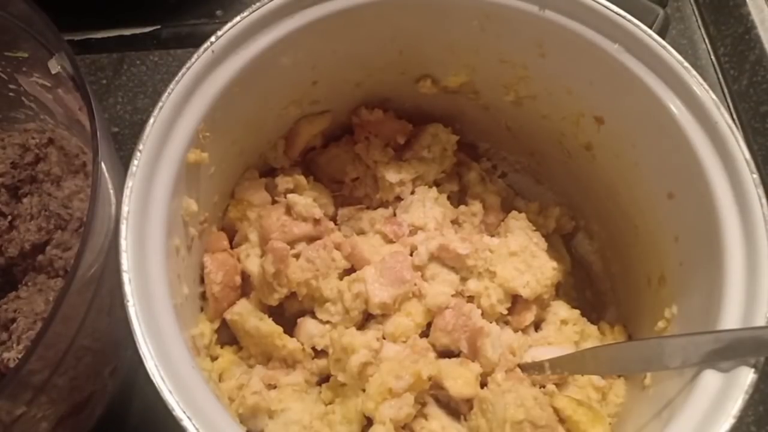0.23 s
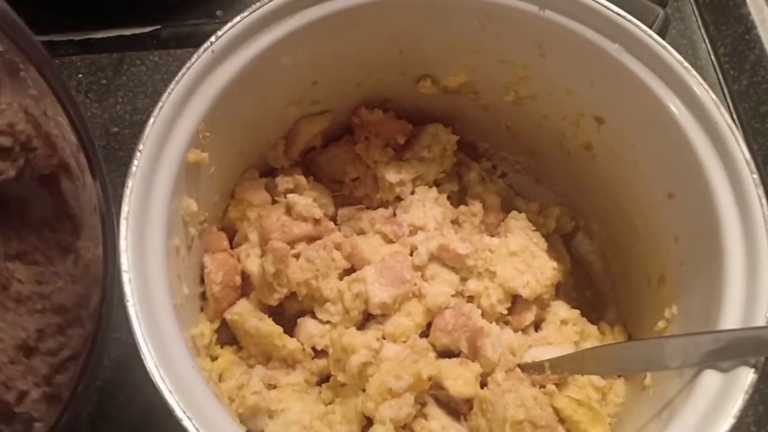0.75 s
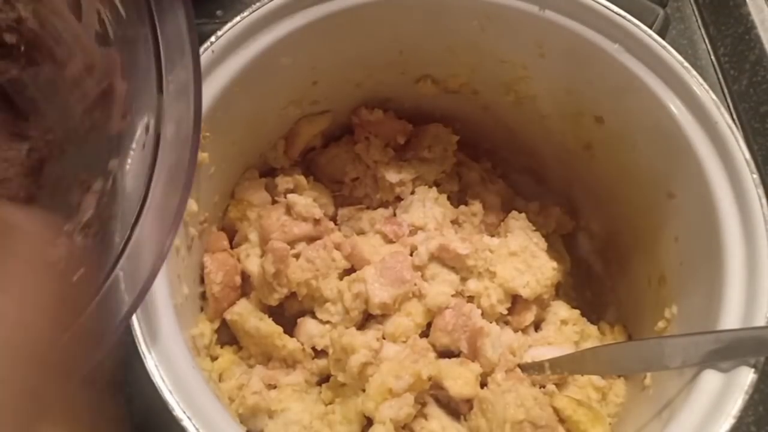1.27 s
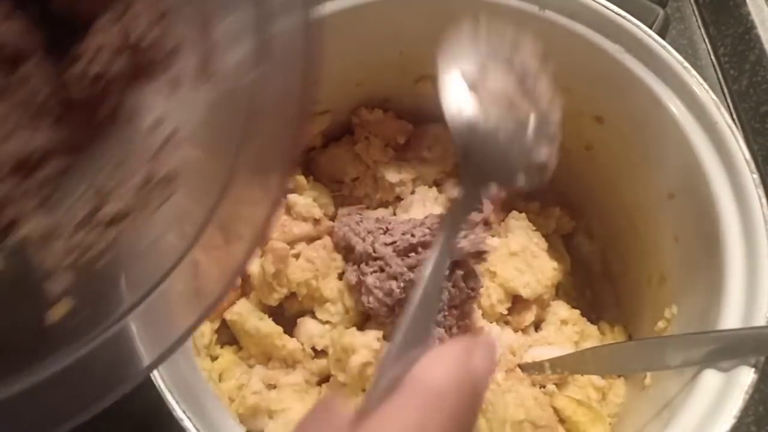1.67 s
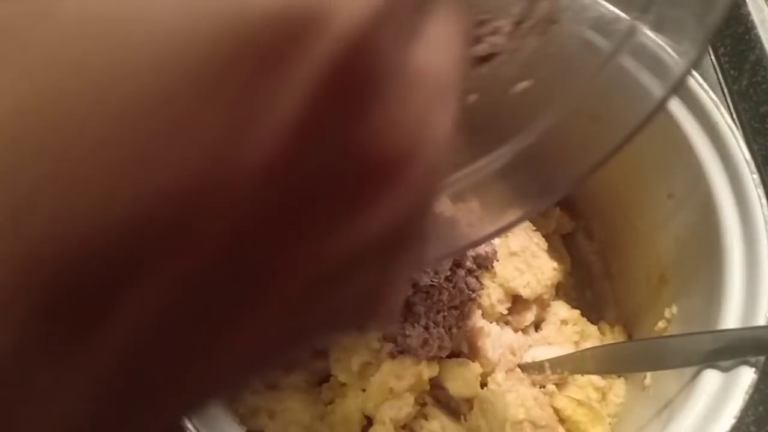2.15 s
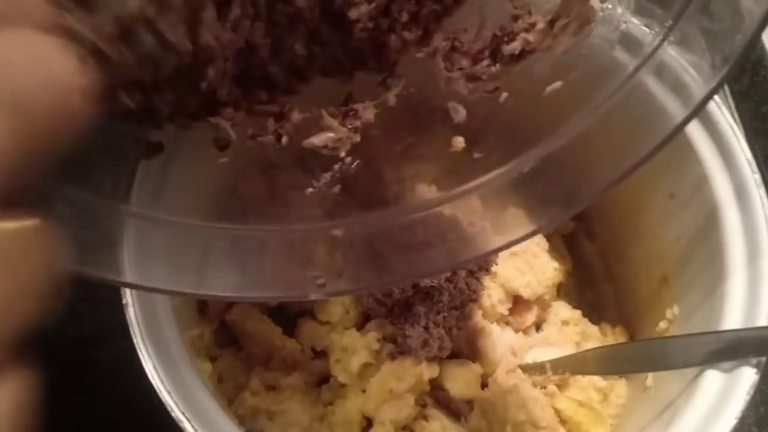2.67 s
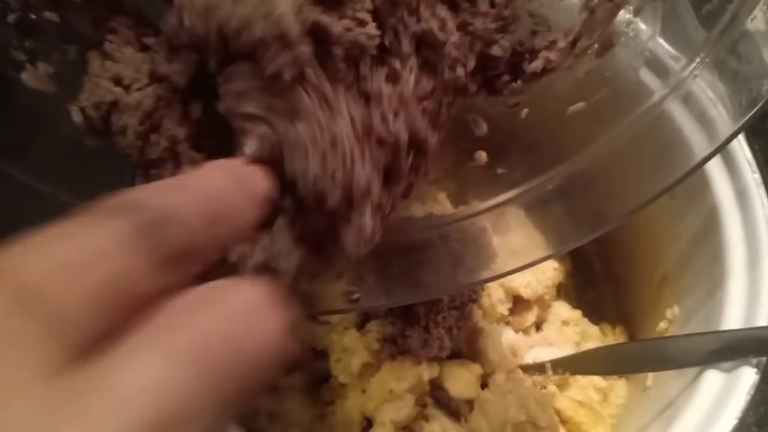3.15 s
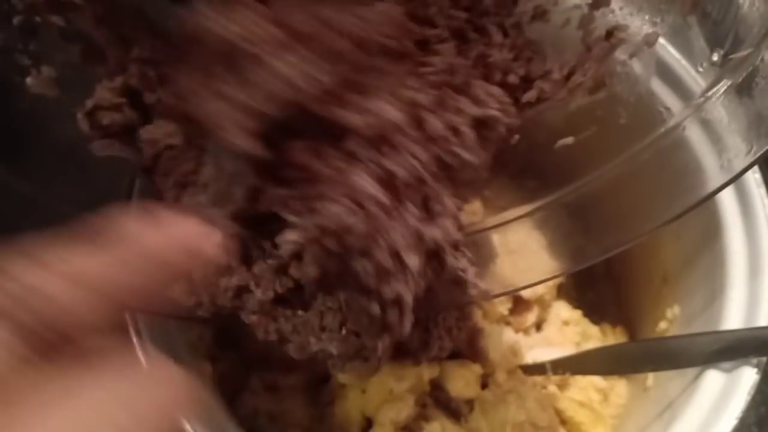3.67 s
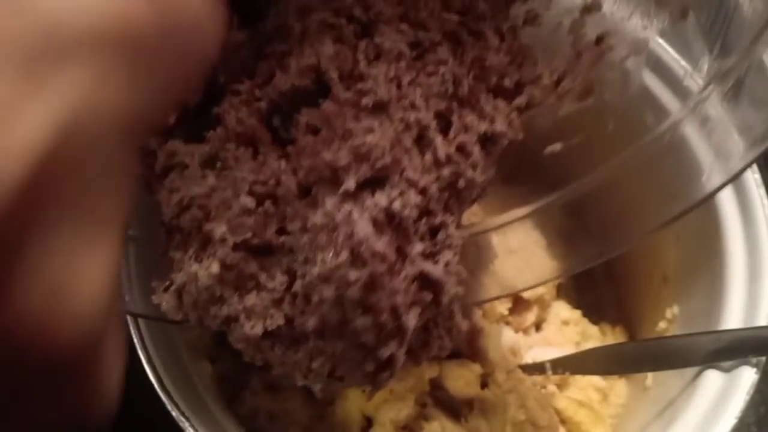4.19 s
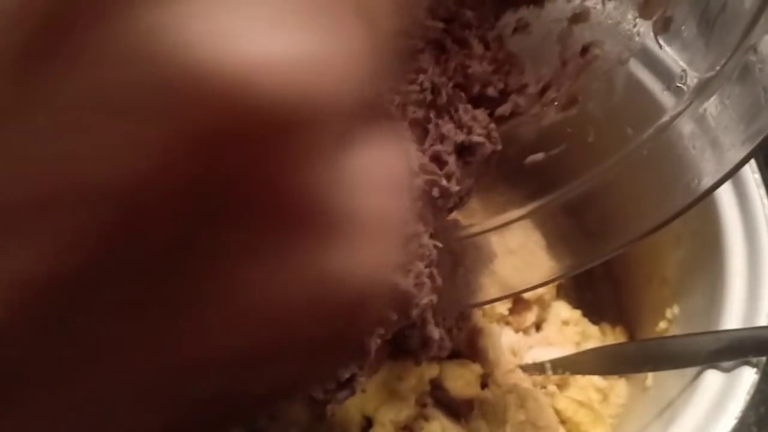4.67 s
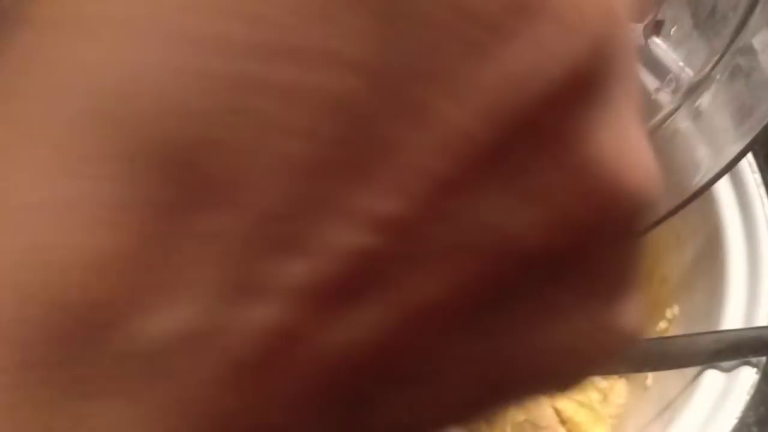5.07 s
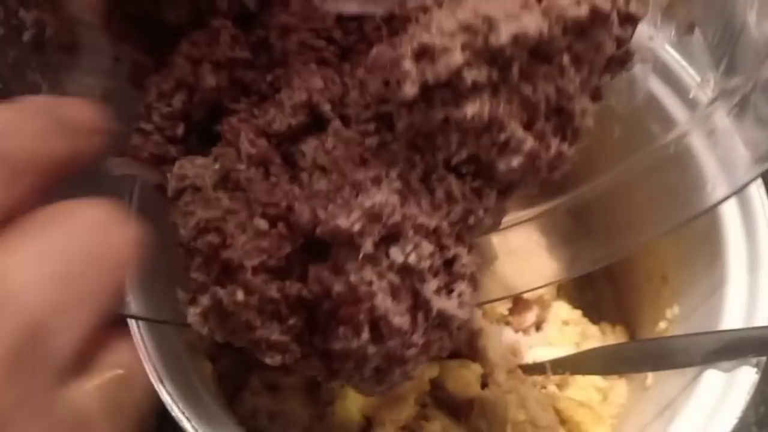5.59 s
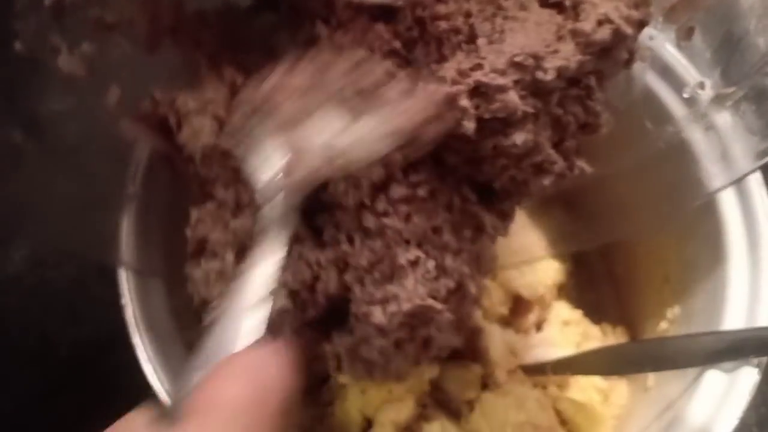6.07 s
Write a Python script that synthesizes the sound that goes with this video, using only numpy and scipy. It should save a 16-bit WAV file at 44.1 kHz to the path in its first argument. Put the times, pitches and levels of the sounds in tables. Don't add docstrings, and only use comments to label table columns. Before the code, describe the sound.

A thick wet mixture is scooped from a bowl into a metal pot. Short dry scrapes and a low rubbing moan lead to hollow, clacking knocks; the mass then crackles, snaps and squelches softly as it is pushed. Bright spoon ticks and low pot booms punctuate it. A brief falling squeak sounds near the end. Close stereo pickup, short lively kitchen echo, quiet appliance hum.

```python
import sys
import numpy as np
from scipy import signal
from scipy.fft import rfft, irfft
from scipy.io import wavfile

SR = 44100
rng = np.random.default_rng(int(sys.argv[2]) if len(sys.argv) > 2 else 0)


def output_pcm(signal):
    pcm = np.clip(np.atleast_2d(signal).T, -1, 1) * 32767
    wavfile.write(sys.argv[1], SR, np.round(pcm).astype(np.int16))


def nominal_scale(level):
    x = np.asarray(level, float) / 20
    return 10 ** x


N = 279594

# (frequency [Hz], density [dB per Hz])
HUM_SPECTRUM = [(12, -47.5), (20, -0.5), (27, -18), (60, -1.5), (79, -24.5), (142, -3), (272, -23.5),
                (304, -18.5), (350, -39.5), (959, -17), (1270, -23), (2490, -17.5), (3300, -34),
                (9570, -33), (16300, -28)]
# (frequency [Hz], t60 [s])
KITCHEN_T60 = [(150, 0.67), (500, 0.49), (1500, 0.42), (3000, 0.35), (6000, 0.4), (12000, 0.37)]
# (frequency [Hz], share [1])
ECHO_ALIKE = [(100, 1), (400, 0.95), (1500, 0.96), (8000, 0.015)]
# (frequency [Hz], level [dB], t60 [s])
POT_MODES = [(106, -2, .7), (116.3, -2, .7), (140, -6, .4), (165, -8, .4), (205, -4, .4), (243, -2, .3),
             (300, -4, .22), (382, -4, .15), (440, -8, .2), (582, -12, .3), (786, -18, .15)]
# (time [s], peak [dB], push length [s], deep boom [dB])
POT_THUDS = [(1.336, -24.5, 0.0012, -7), (1.344, -28.5, 0.0018, 1), (1.426, -28.5, 0.0027, -6.5),
             (2.135, -24.5, 0.0017, -7), (2.149, -40, 0.0058, 5.5), (2.27, -42, 0.00051, -21),
             (3.09, -31.5, 0.0064, -28), (3.664, -29, 0.0028, -11), (3.711, -41, 0.0011, -27),
             (4.371, -29, 0.0032, -31), (5.226, -39.5, 0.00057, -45), (6.059, -41.5, 0.00098, -9),
             (6.084, -33.5, 0.0042, -8.5)]
# (time [s], peak [dB])
FIBRE_SNAPS = [(2.2992, -20), (2.3521, -36), (2.376, -32), (2.3979, -28), (2.4598, -27), (2.8508, -18),
               (2.8654, -35), (3.1313, -36), (3.1434, -38), (3.1594, -41.5), (3.3857, -29.5), (3.904, -28),
               (3.9694, -36), (4.0133, -39), (4.114, -31), (5.0609, -31), (5.3302, -26), (5.3682, -37),
               (5.3824, -49), (5.4575, -35), (5.8426, -34), (5.896, -43), (5.9174, -45), (6.2672, -39)]
# (frequency [Hz], level [dB])
SNAP_SPECTRUM = [(800, -29), (2500, -5), (3600, -11), (5200, 8), (8000, -13), (13500, -15), (16000, -28)]
# (start [s], length [s], scrape [dB], wetness [dB], brightness [dB])
MINCE_PUSHES = [(0.0, 0.12, -47, -22.5, 8), (0.144, 0.059, -48, -25, 10), (0.26, 0.2, -57, -12, 2),
                (0.44, 0.47, -54.5, 6.5, -3), (0.783, 0.13, -47.5, -20, -7), (0.954, 0.24, -61.5, 2.5, -4),
                (1.145, .15, -57, -5.5, 3.5), (1.318, 0.3, -57, -4.5, -2), (1.585, 0.04, -55, 12, -6),
                (1.907, 0.15, -70, -29, 7), (2.258, 0.23, -54, 1.5, -1.5), (2.413, 0.4, -46.5, -0.5, -0.5),
                (2.762, 0.42, -65.5, 21.5, -2), (2.987, 0.24, -48, 1.5, -5.5), (3.204, 0.21, -65.5, 19, -7),
                (3.417, 0.14, -61, -12, 5), (3.485, 0.41, -53.5, 0.5, 2), (3.735, 0.12, -54.5, 12, 7.5),
                (3.899, 0.063, -48.5, 1.5, -0.5), (4.029, 0.12, -53, 14, 1.5), (4.51, 0.45, -55, -9, 2.5),
                (4.796, 0.19, -50, -6, 0), (5.027, 0.05, -59, 15.5, 2), (5.287, 0.25, -58, 2.5, 2.5),
                (5.464, 0.065, -76.5, 29.5, -3), (5.533, 0.093, -54, 1, -5), (5.775, 0.24, -55.5, 5.5, -3),
                (5.914, 0.22, -50.5, -5, 3), (6.06, 0.12, -50, -3.5, -3), (6.214, 0.11, -53.5, -1, 5)]
# (start [s], length [s], level [dB])
BOWL_DRAGS = [(0.0, 0.085, -46), (.15, .25, -52), (.48, 0.39, -36), (.72, 0.15, -52), (.9, 0.39, -61.5),
              (1.4, 0.25, -59), (2.3, 0.53, -56.5), (3.05, 0.24, -56), (3.5, 0.19, -62), (4.4, 0.21, -45.5),
              (5.55, 0.075, -46), (6.05, 0.088, -48)]
# (frequency [Hz], density [dB per Hz])
DRAG_SPECTRUM = [(71, -46), (120, -49), (200, -19), (248, -15.5), (513, -22), (571, -1), (717, -26),
                 (782, -12), (1600, -36), (2080, -65), (3520, -120)]
# (frequency [Hz], density [dB per Hz])
SCRAPE_SPECTRUM = [(410, -17), (700, -1.5), (828, -8.5), (1050, -4), (1450, -9), (1800, -3.5), (2500, 0),
                   (2860, 1), (3200, -4.5), (3900, -26), (7700, -120)]
# (frequency [Hz], density [dB per Hz])
CRACKLE_SPECTRUM = [(1940, -15.5), (3100, -6), (3700, -2), (4400, 1.5), (5200, 3.5), (7500, -15),
                    (9750, -14.5), (16500, -120)]
# (frequency [Hz], density [dB per Hz])
SIZZLE_SPECTRUM = [(4120, -17), (7000, 1), (9900, -7), (11400, -4.5), (12500, -2.5), (13900, 0), (15700, 2),
                   (16100, -19), (16300, -55)]
# (time [s], pitch [Hz], level [dB])
SQUEAK_TRACKS = [
    [(5.138, 2743, -48.5), (5.15, 2728, -14), (5.168, 2638, -9), (5.178, 2630, -15.5), (5.2, 2590, -19.5),
     (5.215, 2563, -30), (5.3, 2536, -37), (5.4, 2516, -47), (5.46, 2490, -58)],
    [(5.6, 2320, -60), (5.61, 2270, -42), (5.624, 2255, -32), (5.638, 2245, -44), (5.65, 2203, -27.5),
     (5.66, 2196, -49), (5.672, 2213, -28), (5.695, 2233, -49), (5.71, 2191, -38)],
]
# (time [s], pitch [Hz], level [dB])
WHINE_TRACKS = [
    [(0.0, 2270, -44), (0.032, 2176, -53), (0.13, 2280, -74)],
    [(5.92, 2626, -62), (5.934, 2500, -38), (5.97, 2574, -52), (6.1, 2220, -45.5)],
    [(6.17, 2200, -59), (6.176, 2167, -54), (6.2, 2280, -36.5), (6.27, 2390, -42), (6.34, 2426, -41)],
]
# (time [s], pitch [Hz], level [dB])
MOAN_TRACK = [
    (0.475, 601, -44),
    (0.501, 571, -32),
    (0.55, 610, -41),
]
# (multiple of pitch [1], level [dB])
SQUEAK_PARTIAL_LEVELS = [(.5, -42), (1, -5), (1.5, -41), (2, -36), (3, -70)]
# (time [s], frequency [Hz], level [dB], t60 [s])
LOOSE_RINGS = [(.02, 1878, -44, 0.17), (0.028, 3100, -45, 0.13), (0.31, 3100, -32.5, 0.037),
               (2.146, 4080, -29, 0.074), (2.17, 5000, -32, 0.038), (2.9882, 870, -33.5, 0.25),
               (4.3747, 296, -27.5, 0.17), (4.371, 1210, -23, 0.15), (4.374, 247, -32.5, .2),
               (4.764, 1300, -18, 0.059), (5.228, 486.4, -37.5, 0.44), (2.413, 2240, -21, 0.013),
               (2.42, 570, -47.5, 0.97), (4.765, 1180, -27, .07), (3.565, 554, -49.5, 0.17),
               (5.57, 557, -35.5, 0.26), (4.375, 1030, -32.5, .15), (4.476, 1060, -30.5, .2),
               (5.603, 1400, -36, 0.066)]
# (frequency [Hz], level [dB], t60 [s])
BOWL_MODES = [(296, -3.5, 0.065), (405, -1, 0.057), (482, 0, 0.15), (522.3, 0.5, 0.087), (567.6, 3.5, 0.1),
              (740, 3, 0.03), (942, -9, 0.18), (1070, -7, 0.12), (1193, 6.5, 0.031), (1256, -7, 0.081),
              (1310, -3.5, 0.023), (1380, -2.5, 0.06), (1640, 4.5, 0.02), (1651, -7, 0.092),
              (1866, 10, 0.037), (2118, 16.5, 0.009), (2187, 6.5, 0.027), (2493, 2, 0.025),
              (2836, -11, 0.18), (2980, 1, 0.014), (2720, -0.5, 0.0072), (3900, -19, 0.024),
              (3780, 1.5, 0.025), (4990, -4.5, 0.039), (4740, -0.5, 0.033), (5330, -1.5, 0.019),
              (5540, -9, 0.012), (5710, -3, 0.0044)]
# (frequency [Hz], level [dB])
SLAP_SPECTRUM = [(100, -43), (400, -17), (1200, -4), (2500, -1.5), (3700, -14.5), (6000, -21), (16000, -78)]
# (frequency [Hz], level [dB])
CRACK_SPECTRUM = [(800, -92), (3000, -10.5), (5000, -4.5), (7000, -12.5), (9500, -26), (13500, -30.5),
                  (16000, -21.5)]
# (time [s], peak [dB], mode nearest contact [Hz], body [dB], tick [dB])
WALL_BLOWS = [(0.675, -11, 442, -9, -14.5), (0.8, -14.5, 482, -42, -9.5), (0.878, -27.5, 1070, -24, -19),
              (1.111, -32.5, 323, -6, -7.5), (1.332, -19, 622, -12, -36), (1.425, -29, 296, -8, -10),
              (2.136, -14.5, 285, -8.5, -8), (2.412, -11.5, 622, -9, -20.5),
              (2.989, -5.5, 1640, -15.5, -32), (3.016, -12, 2260, -42, -16.5), (3.025, -22.5, 942, -3, -15),
              (3.666, -25, 300, -12, -14), (3.939, -34.5, 576, -41, -4), (4.371, -5.5, 482, -21, -8),
              (4.472, -5.5, 2710, -15.5, -10), (4.49, -14, 2500, -16, -31),
              (4.763, -11.5, 1310, -11.5, -14.5), (5.202, -19.5, 2440, -17, -14),
              (5.213, -6.5, 1990, -31, -29), (5.226, -4.5, 493, -21.5, -20),
              (5.236, -21.5, 2510, -15, -9.5), (5.709, -11, 1450, -14.5, -29),
              (5.929, -39.5, 2570, -10, -5.5), (3.969, -32, 440, -26, -8.5)]
# (time [s], peak [dB], mode nearest contact [Hz], body [dB])
LIGHT_TAPS = [
    (2.955, -39, 2700, -23),
    (2.983, -34, 600, -5),
    (3.712, -35.5, 410, 2),
    (5.567, -32.5, 959, 1.5),
    (5.602, -27, 1193, 1.5),
    (0.307, -26.5, 2900, -18),
]
# (time [s], peak [dB], mode nearest contact [Hz], body [dB])
RIM_BUMPS = [(0.182, -22.5, 2850, -25.5), (6.058, -30, 407, -28), (6.076, -20, 748, -28),
             (0.687, -7, 436, -42), (0.719, -32, 455, -3), (3.831, -35, 2800, -41), (3.904, -43, 5000, -30),
             (3.916, -20, 607, -9.5), (4.811, -30, 530, -7), (6.115, -30.5, 780, -17),
             (6.136, -52, 780, -17)]
# (time [s], peak [dB], mode nearest contact [Hz])
TIP_TICKS = [
    (2.142, -12.5, 5100),
    (3.465, -40, 2200),
    (2.857, -29, 4700),
    (3.437, -38, 5370),
    (5.5, -30.5, 5160),
    (5.029, -36.5, 3050),
    (5.076, -34, 6500),
    (2.9, -36, 5400),
    (5.87, -34, 5070),
]


def rms_one(x):
    return x / np.sqrt(np.mean(x ** 2) + 1e-20)


def butter(x, order, hz, kind):
    return signal.sosfilt(signal.butter(order, hz, kind, fs=SR, output="sos"), x)


def in_time(rows):
    s, *columns = np.transpose(rows)
    return [np.interp(np.arange(N) / SR, s, c) for c in columns]


def at_hz(points, hz):
    points_hz, values = np.transpose(points)
    return np.interp(np.log(hz), np.log(points_hz), values)


def colour(x, points):
    size = 4096
    hz = np.arange(size // 2 + 1) * SR / size + 1
    cepstrum = irfft(np.log(nominal_scale(at_hz(points, hz))))
    cepstrum[1:size // 2] *= 2
    cepstrum[size // 2 + 1:] = 0
    impulse = irfft(np.exp(rfft(cepstrum)))
    return signal.oaconvolve(x, impulse[None], axes=1)[:, :x.shape[-1]]


def drift(rate_hz):
    step = 40
    r = np.exp(-2 * np.pi * rate_hz * step / SR)
    noise = rng.standard_normal(N // step + 2002)
    slow = signal.lfilter([1], [1, -2 * r, r * r], noise)[2000:]
    return np.interp(np.arange(N) / step, np.arange(len(slow)), rms_one(slow))


def ring(force, hz, t60_s):
    r, w = nominal_scale(-60 / (t60_s * SR)), 2 * np.pi * hz / SR
    return signal.lfilter([0, np.sin(w)], [1, -2 * r * np.cos(w), r * r], force + 1e-18)


def clicks(times_s, heights):
    out = np.zeros((2, N))
    out[:, np.round(times_s * SR).astype(int)] = heights
    return out


def grains(per_s, spread_db, clump_db, alike):
    sizes = nominal_scale(spread_db * np.minimum(rng.exponential(1, N), 5))
    flip = np.where(rng.random(N) < (1 + alike) / 2, 1, -1)
    signs = rng.choice([-1, 1], N) * np.array([np.ones(N), flip])
    present = rng.random(N) < per_s * nominal_scale(clump_db * drift(15)) / SR
    return rms_one(signs * sizes * present)


def from_right(x, lag_s, pan_db):
    left = np.interp(np.arange(N) - lag_s * SR, np.arange(N), x[0])
    return np.array([nominal_scale(-pan_db) * left, nominal_scale(pan_db) * x[-1]])


def hum(level_db=-64.5, alike=0.6):
    mid, side = colour(rng.standard_normal((2, N)), HUM_SPECTRUM)
    side = (1 - alike) * side
    return nominal_scale(level_db) * rms_one(np.array([mid + side, mid - side]))


def kitchen(x, early_db=18.0):
    t = np.arange(SR) / SR
    shared, own = rng.standard_normal(SR), rng.standard_normal((2, SR))
    edges_hz = 60 * 2. ** np.arange(9)
    tail = 0
    for low, high in zip(edges_hz, edges_hz[1:]):
        hz = np.sqrt(low * high)
        alike = np.clip(at_hz(ECHO_ALIKE, hz), 0, 1)
        noise = alike * shared + np.sqrt(1 - alike ** 2) * own
        tail = tail + butter(noise, 2, [low, high], "band") * nominal_scale(-60 * t / at_hz(KITCHEN_T60, hz))
    flash = np.exp(-t / .002)
    walls = np.clip((t - .004) / .012, 0, 1)
    tail = tail * (nominal_scale(early_db) * flash + walls)
    tail = tail / np.sqrt(np.sum(tail ** 2) / 2)
    return signal.fftconvolve(x, tail, axes=1)[:, :N]


def shaded(x, depth_db=2.5, rate_hz=5.6):
    edges_hz = 1000 * 2 ** (np.arange(10) / 3)
    out = x
    for low, high in zip(edges_hz, edges_hz[1:]):
        out = out + (nominal_scale(depth_db * drift(rate_hz)) - 1) * butter(x, 1, [low, high], "band")
    return out


def thuds():
    out = np.zeros(N)
    for s, peak_db, push_s, boom_db in POT_THUDS:
        start = round(s * SR)
        soft = np.exp(-1 / (np.clip(push_s, 1e-4, .02) * SR / 4))
        push = signal.lfilter([(1 - soft) ** 2], [1, -2 * soft, soft ** 2], np.arange(SR) == 0)
        for hz, level_db, t60_s in POT_MODES:
            deep = hz < 150
            zone_db = boom_db if deep else -4.0
            luck_db = (hz > 150) * rng.normal(0, 3.4)
            held = np.clip(nominal_scale(boom_db + 3), .3, 1) if deep else 1
            boom = ring(push, hz, held * t60_s)[:N - start]
            out[start:start + SR] += nominal_scale(peak_db + level_db + zone_db + luck_db) * boom
    return out


def snaps(decay_s=0.0017, level_db=-6):
    s, peak_db = np.transpose(FIBRE_SNAPS)
    releases = clicks(s, nominal_scale(peak_db + level_db)) + 1e-18
    puffs = signal.lfilter([1], [1, -np.exp(-1 / (decay_s * SR))], releases)
    noise = rng.standard_normal(N) + 0.53 * rng.standard_normal((2, N))
    return colour(puffs * noise, SNAP_SPECTRUM)


def strokes_gain(strokes, resting_db):
    rise_share, fall_share, release_s = 0.15, 0.43, 0.022
    power = np.full(N, nominal_scale(2 * resting_db))
    for start_s, length_s, db in strokes:
        part = power[round(start_s * SR):][:SR]
        t = np.arange(len(part)) / SR
        rise = np.clip(t / (rise_share * length_s), 0, 1) if start_s > 0 else 1
        late = np.maximum(t - (1 - fall_share) * length_s, 0)
        fall = np.exp(-(late / (fall_share * length_s / 2 + release_s)) ** 2)
        part += nominal_scale(2 * db) * rise ** 2 * fall
    return np.sqrt(power)


def pushed(offset_db, per_wet, per_bright=0):
    rows = [(s, length_s, db + per_wet * wet_db + per_bright * bright_db)
            for s, length_s, db, wet_db, bright_db in MINCE_PUSHES]
    return nominal_scale(offset_db) * strokes_gain(rows, -70 - 3.8 * per_wet)


def mince():
    split_hz = 1160
    press = nominal_scale(2.46 * drift(3.85) + 1.0 * drift(40))
    rub = grains(2000, spread_db=2.5, clump_db=3.0, alike=.4)
    pops = grains(1500, spread_db=2.5, clump_db=5.0, alike=0.59)
    pops = pops + 0.2 * grains(40, spread_db=3, clump_db=6, alike=.6)
    hiss = rng.standard_normal((2, N))
    scrape = rms_one(press * nominal_scale(2.1 * drift(12.4)) * colour(rub, SCRAPE_SPECTRUM))
    crackle = rms_one(press * nominal_scale(1.6 * drift(53)) * colour(0.19 * rub + pops, CRACKLE_SPECTRUM))
    sizzle = rms_one(press * colour(pops + 0.4 * hiss, SIZZLE_SPECTRUM))
    dull = butter(scrape, 2, split_hz, "low")
    bright = butter(scrape, 2, split_hz, "high")
    out = pushed(0, 0, -2.1) * dull - pushed(0, 0, 0.44) * bright
    return out + pushed(-0.8, 0.4) * crackle + pushed(-10, 0.7) * sizzle


def drags():
    jerks = grains(900, spread_db=1.5, clump_db=0.0, alike=0.83)
    body = sum(nominal_scale(db) * ring(jerks, hz, .5 * t60_s) for hz, db, t60_s in BOWL_MODES[:7])
    drag = rms_one(rms_one(body) + 0.62 * rms_one(colour(jerks, DRAG_SPECTRUM)))
    drag = butter(drag, 2, 170, "high")
    return strokes_gain(BOWL_DRAGS, resting_db=-68.0) * drag


def squeaks(tracks, wobble, flutter_db):
    out = np.zeros(N)
    for rows in tracks:
        span = slice(round(rows[0][0] * SR), min(round(rows[-1][0] * SR), N))
        hz, level_db = (curve[span] for curve in in_time(rows))
        phase = 2 * np.pi * np.cumsum(hz * (1 + wobble * drift(78)[span])) / SR
        on = signal.windows.tukey(len(hz), min(0.015 * SR / len(hz), 1))
        force = nominal_scale(0.9 * (level_db + 14.5))
        tone = 0
        for multiple, db in SQUEAK_PARTIAL_LEVELS:
            tone = tone + nominal_scale(db) * (1 if multiple == 1 else force) * np.sin(multiple * phase)
        out[span] += np.sqrt(2) * on * nominal_scale(level_db + flutter_db * drift(70)[span]) * tone
    return out[None]


def rings(split=0.0118):
    out, t = np.zeros((2, N)), np.arange(SR // 2) / SR
    for s, hz, level_db, t60_s in LOOSE_RINGS:
        turn = rng.uniform(0, 2 * np.pi, (2, 1))
        pair = np.sin(2 * np.pi * hz * t) + 2.5 * np.sin(2 * np.pi * hz * (1 + split) * t + turn)
        envelope = nominal_scale(level_db - 60 * t / t60_s) * np.clip(t / 0.00056, 0, 1)
        out[:, round(s * SR):][:, :len(t)] += pair * envelope
    return out


def contacts():
    blows = [(s, db, hz, body_db, -13, tick_db) for s, db, hz, body_db, tick_db in WALL_BLOWS]
    taps = [(*row, -11.5, -21) for row in LIGHT_TAPS]
    bumps = [(*row, -31, -31.5) for row in RIM_BUMPS]
    ticks = [(*row, -24, -31.5, -9) for row in TIP_TICKS]
    s, *levels = np.transpose(blows + taps + bumps + ticks)
    return s + 0.0003, *levels


def slaps():
    s, peak_db, _, _, wall_db, tick_db = contacts()
    noise = .5 * rng.standard_normal(N) + 1.065 * rng.standard_normal((2, N))
    out = 0
    for zone_db, spectrum, last_s in ((wall_db + 16.0, SLAP_SPECTRUM, .0045),
                                      (tick_db + 10.0, CRACK_SPECTRUM, .0035)):
        swell = np.arange(round(last_s * SR)) / (last_s * SR)
        hump = np.sin(np.pi * swell ** 0.5) ** 2
        burst = signal.oaconvolve(clicks(s, nominal_scale(peak_db + zone_db)), [hump], axes=1)[:, :N]
        out = out + colour(burst * noise, spectrum)
    return out


def knocks(favour_db=10.5, scatter_db=3.0, facing_db=4.5, ping_cycles=14):
    s, peak_db, near_hz, body_db, wall_db, tick_db = contacts()
    luck = rng.standard_normal((len(s), len(BOWL_MODES), 3))
    out = np.zeros((2, N))
    for k, (hz, level_db, t60_s) in enumerate(BOWL_MODES):
        zone_db = body_db if hz < 850 else wall_db if hz < 3400 else tick_db
        near_db = favour_db * np.exp(-(np.log(hz / near_hz) / 0.11) ** 2)
        strength = nominal_scale(peak_db + zone_db + near_db + level_db + scatter_db * luck[:, k, 0] - 6.5)
        facing = nominal_scale(facing_db * min(hz / 1200, 1) * luck[:, k, 1:].T)
        out += ring(clicks(s, facing * strength * (-1) ** k), hz, t60_s)
    t = np.arange(SR // 10) / SR
    for at_s, hz, db in zip(s, near_hz, peak_db):
        ping = np.sin(2 * np.pi * hz * t) * nominal_scale(db - 6.5 - 60 * t * hz / ping_cycles)
        out[:, round(at_s * SR):][:, :len(t)] += ping * np.clip(t / 0.0011, 0, 1)
    return out


def scene():
    lag_s, squeak_lag_s = .00027, .000376
    slap = slaps()
    struck = from_right(knocks() + slap + rings() + thuds(), lag_s, pan_db=-0.35)
    rubbed = from_right(drags() + mince(), lag_s, pan_db=-0.34)
    whines = nominal_scale(-7.5) * squeaks(WHINE_TRACKS, wobble=0.0444, flutter_db=2.5)
    moan = squeaks([MOAN_TRACK], wobble=.004, flutter_db=1)
    clean = squeaks(SQUEAK_TRACKS, wobble=.0015, flutter_db=1.5)
    squeal = from_right(clean + moan + whines, squeak_lag_s, pan_db=1.5)
    to_room = nominal_scale(-5.0) * struck + nominal_scale(-0.5) * slap + nominal_scale(-1.0) * rubbed + nominal_scale(3.0) * squeal
    heard = struck + squeal + shaded(rubbed + kitchen(to_room))
    heard = heard + from_right(snaps(), lag_s, pan_db=0.3)
    return butter(heard, 4, 100.5, "high") + hum()


def top_cut(x):
    return signal.sosfilt(signal.butter(12, 16630, fs=SR, output="sos"), x)


def record(dry):
    dip_hz, dip_width_hz, dip_share, top_hz, offset = 9730, 1840, 0.56, 16500, .0009
    b, a = signal.iirpeak(dip_hz, dip_hz / dip_width_hz, fs=SR)
    dipped = dry - dip_share * signal.lfilter(b, a, dry)
    cut = signal.sosfilt(signal.cheby2(10, 60, 0.991 * top_hz, fs=SR, output="sos"), dipped)
    return top_cut(np.clip(cut + offset, -.99, .99))


dry = scene()
out = record(dry)
output_pcm(out)
```